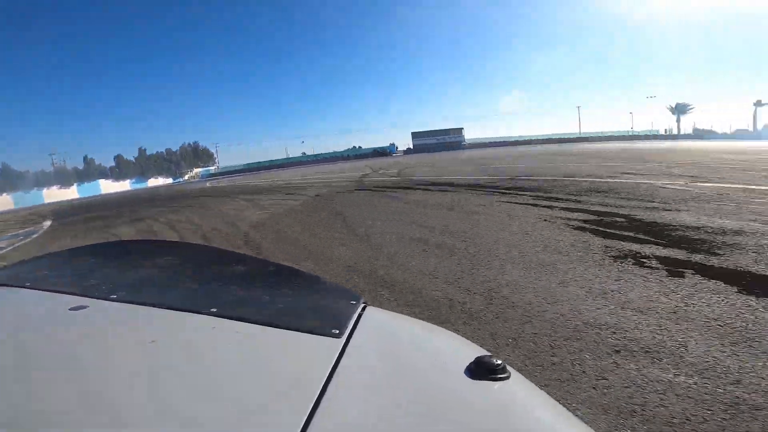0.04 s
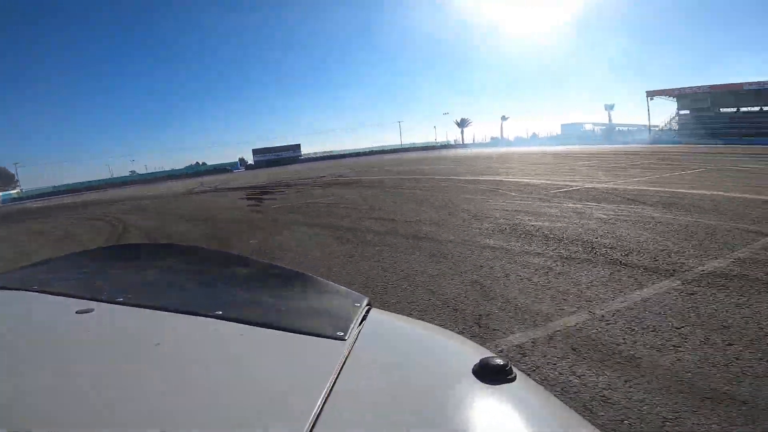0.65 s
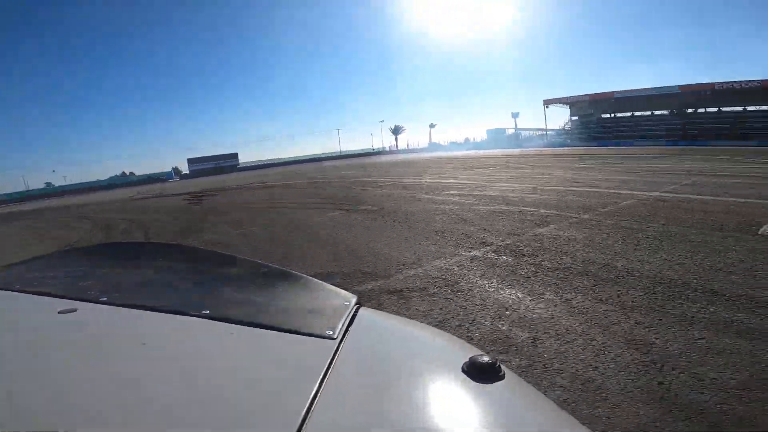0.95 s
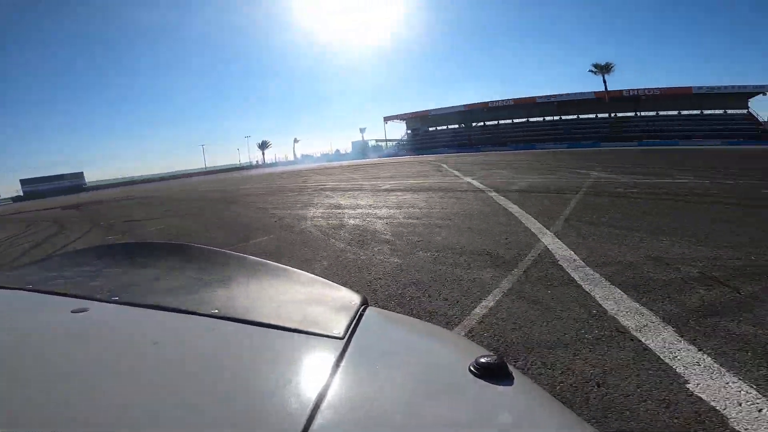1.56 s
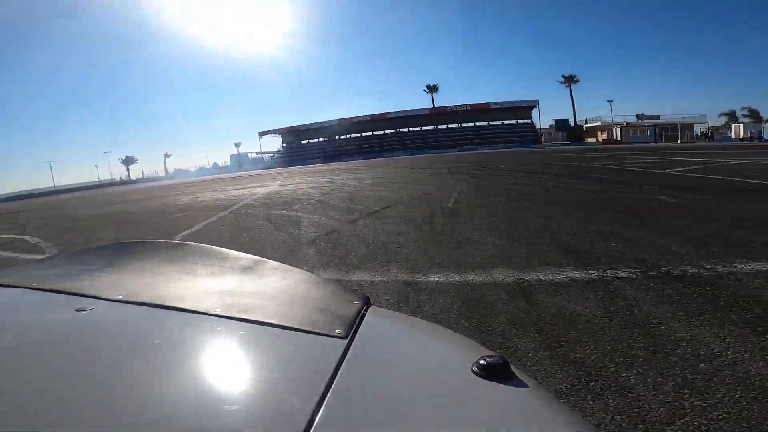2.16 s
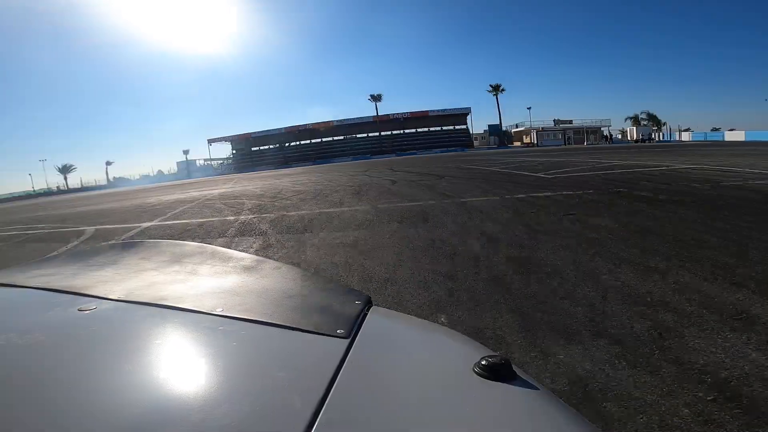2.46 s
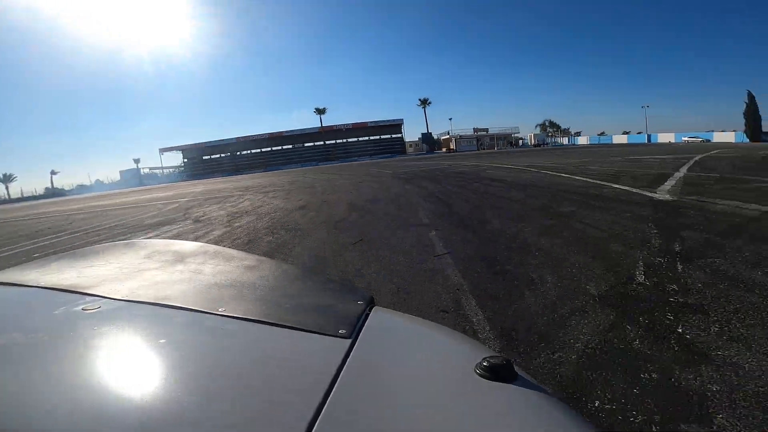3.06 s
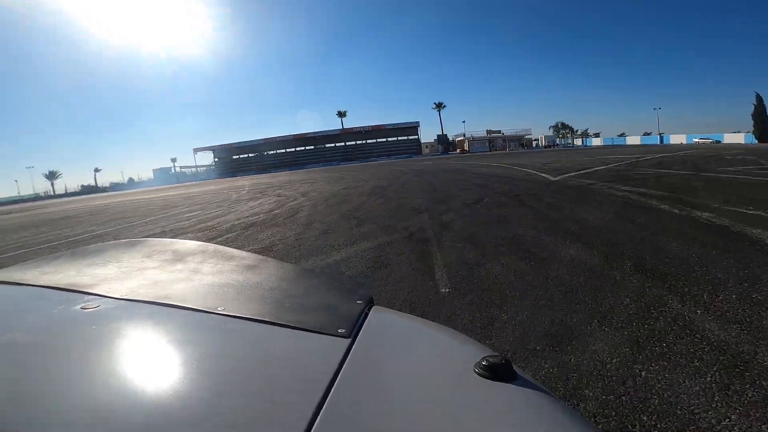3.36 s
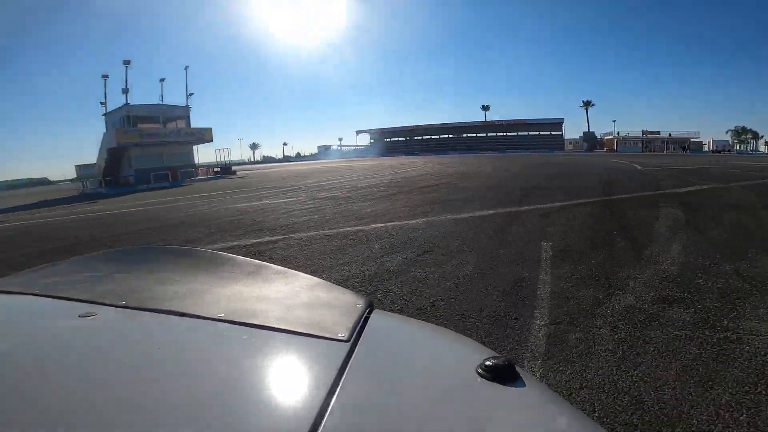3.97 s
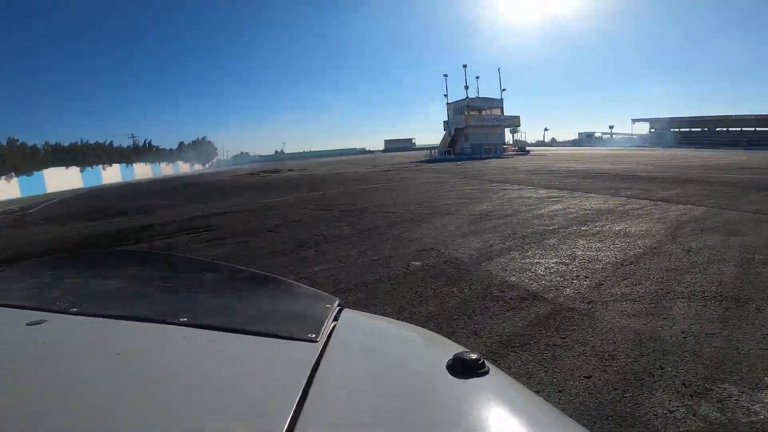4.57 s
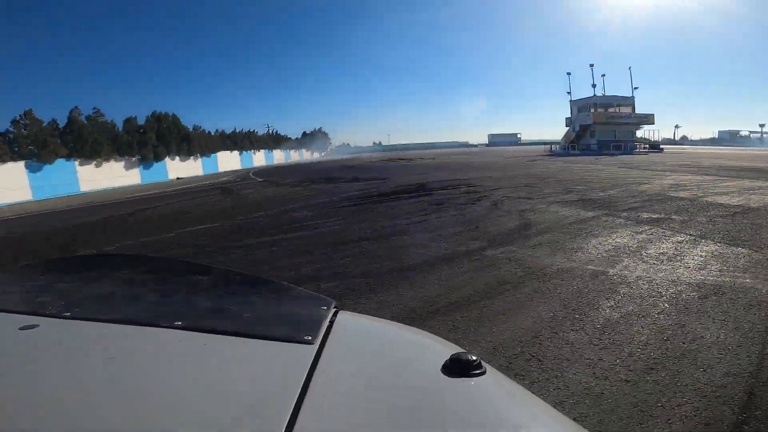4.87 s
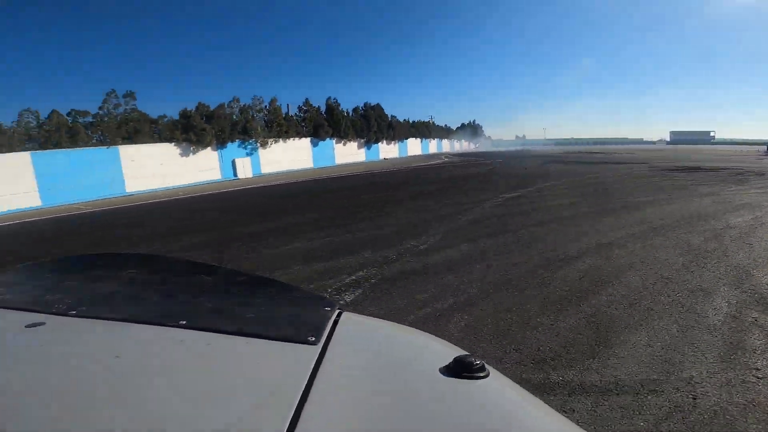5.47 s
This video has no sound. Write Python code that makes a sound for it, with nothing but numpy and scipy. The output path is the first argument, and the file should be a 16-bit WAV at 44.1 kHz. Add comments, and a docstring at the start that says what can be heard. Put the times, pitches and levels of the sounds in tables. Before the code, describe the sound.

A car drifts on a paved track, heard from a microphone on its body. From the start the tyres give a loud, high, wavering squeal that shifts between a clean tone and rough scrubbing. It grows harder and brighter from about 0.5 seconds, with quick chirps between 2 and 2.6 seconds. Underneath, a V8 engine drones unevenly, revving up around 0.5 and 2 seconds. At about 3.4 seconds the squeal falls back as the car swings into the next slide, and the engine comes through with its strongest snarling rev until 4.2 seconds, dotted with short tyre squeaks. The squeal returns just after 4 seconds, and from 4.7 seconds a higher, scraping shriek joins it with a brief throttle blip, lasting to the end at about 5.6 seconds. Low wind buffeting, road rumble and a fluttering hiss of rubber on grit continue throughout.

```python
"""Tyres squeal and chirp in unsteady stick-slip as a V8 car drifts round a paved track.
They fall back as the car swings from one slide into the next, and the revving engine comes through,
its uneven firings ringing the intake and exhaust. The microphone rides on the car's body:
wind buffets it, and the road rumbles and hisses all along."""
import sys
import numpy as np
from scipy import signal
from scipy.fft import rfft, irfft, next_fast_len
from scipy.io import wavfile
from scipy.ndimage import uniform_filter1d

SR = 44100
rng = np.random.default_rng(int(sys.argv[2]) if len(sys.argv) > 2 else 0)


def to_wav(sig):
    """Store sig (one row per channel, or 1-D mono) as 16-bit WAV at the path in sys.argv[1].

    Samples outside -1..1 are clipped; the rate is SR.
    """
    pcm = np.clip(np.atleast_2d(sig), -1, 1) * 32767
    pcm = np.round(pcm).astype(np.int16)
    wavfile.write(sys.argv[1], SR, pcm.T)  # frames by channels


N = 247842
T = np.arange(N) / SR


def squeal(hz, hard_db, purity):
    """One tread rib sings fairly clean; others scrub around its pitch, and their slips add overtones."""
    # overtones of the slip cycle: multiple, level_db
    low_partials = [(2, 2.5), (3, -9.5)]
    # its bright top edge: multiple, level_db
    top_partials = [(4, 0.5), (5, -6), (6, -20)]
    phase, strength = stick_slip(hz * (.99 + scoops()), (.019, 30.8), (.01399, 251), (3.5, 54))
    clean = strength * np.sin(phase)
    scrub, overtones, edge = 0, 0, 0
    scrub_hz = hz * (hz / np.mean(hz)) ** .3  # scrubbing ribs bend further with the load
    for ratio in (.96, .987, 1.015):
        phase, strength = stick_slip(scrub_hz * ratio, (.027, 35), (.024, 330), (3.6, 100))
        scrub += strength * np.sin(phase)
        overtones += strength * partials(phase, low_partials)
        edge += strength * partials(phase, top_partials)
    # the stiffer shoulder of the tread rings higher, the soft middle lower
    for ratio, share_db, octave_db in [(1.19, -5.5, -18), (1.07, 1.7, -1), (.895, -1.5, -.5)]:
        phase, strength = stick_slip(hz * ratio, (.035, 45), (.03494, 232.5), (4, 43))
        scrub += strength * undb(share_db) * np.sin(phase)
        overtones += strength * undb(octave_db) * np.sin(2 * phase)
    note = np.sqrt(purity) * unit(clean) + np.sqrt(1 - purity) * unit(scrub)
    grip = held(3.458, 4.07, attack_s=.15, release_s=.086)  # the tyres grip between the two slides
    body = share_load(note, evenness=.48) * undb(-22 - 9.5 * grip)
    bite = share_load(overtones, evenness=.12) * undb(-34.5 + .68 * hard_db - 9 * grip)
    unload_s, unload_db_per_s = 4.27, 3  # the weight moves over to the other tyre
    load = undb(-unload_db_per_s * np.maximum(T - unload_s, 0))
    return load * (body + bite) + unit(edge) * undb(-61 + hard_db)


def slip():
    """Pitch, hardness and purity of the slide; biting on coarse asphalt makes it harder and higher."""
    # the sliding tread: time_s, pitch_hz, hardness_db, clean_share (0-1)
    slide = [(0, 1039, -3.5, 0.8), (.35, 1092, -1.5, 0.8), (.52, 1108, 1, .15), (.92, 1086, 2.5, .65),
             (1.22, 1078, 3.5, .1), (1.5, 1045, 1, 0.4), (1.78, 1065, 0.5, .65), (2.25, 1083, 1.5, 0.4),
             (2.55, 1130, 3, .3), (2.88, 1098, 0, .63), (3.35, 1087, -6.5, .8), (3.52, 1064, -10.5, 0.4),
             (3.8, 1179, -10.5, .22), (4.27, 1151, -9, 0.5), (4.45, 1084, -2.5, 0.6), (4.62, 1030, -0.5, 0),
             (4.8, 1081, -1.5, .12), (5.62, 1096, 1, 0)]
    # bites of the tread: centre_s, half_width_s, added_hardness_db
    bites = [(.47, 0.06024, 2.5), (.76, 0.11915, 1.5), (1.03, .08, 3.5), (1.26, 0.0801, 2),
             (1.59, .08, 4.5), (1.91, 0.0592, 3), (2.09, 0.0602, 3), (2.33, .08, 4.5), (2.49, .07, 4),
             (2.61, .08, 4), (2.76, 0.0596, 2.5), (3.21, .08, 4), (4.52, 0.0601, 4)]
    hz, hard_db, purity = curves(slide)
    bite_db, bite_hz_per_db = swells(bites), 8
    patchy_db = 1.6 * walk(10)  # grip varies from patch to patch
    return hz + bite_hz_per_db * bite_db, hard_db + bite_db + patchy_db, np.clip(purity, 0, 1)


def stick_slip(hz, wander, jitter, flutter):
    """Phase and strength of a rib that grips and lets go, wandering and shaken by the asphalt's grain."""
    # wander, jitter: (share of the pitch, rate_hz); flutter: (depth_db, rate_hz)
    drift, shake, flutter_db = (depth * walk(rate_hz) for depth, rate_hz in (wander, jitter, flutter))
    phase = 2 * np.pi * np.cumsum(hz * (1 + drift + shake)) / SR
    return phase, unit(undb(flutter_db))


def scoops():
    """The pitch sags and snaps back as the tread winds up and lets go at uneven intervals."""
    per_s, depth, snap_s = 9, .04495, .014
    cycles = np.cumsum(per_s * np.exp(.35 * walk(6))) / SR + rng.random()
    return depth * uniform_filter1d(.5 - cycles % 1, int(snap_s * SR))


def share_load(x, evenness):
    """The ribs share one friction force: as one slips harder the others ease, evening the sum; rms 1."""
    power = uniform_filter1d(unit(x) ** 2, SR // 45) + .01
    return unit(x * power ** (-evenness / 2))


def shriek():
    """The other rear tyre sinks to a lower note and shrieks mostly on its octave, in a haze of scraping."""
    # its slides: start_s, end_s, first_pitch_hz, level_db
    slides = [(1.202, 1.835, 1023, -37.5), (4.27, 4.6, 1180, -32), (4.702, 5.8, 1061, -26)]
    settled_hz, settle_s, fade_s = 970, .2, .08
    hz, gain = settled_hz, 0
    for start, end, first_hz, db in slides:
        sliding = held(start, end, fade_s, fade_s)
        sinking_hz = settled_hz + (first_hz - settled_hz) * np.exp(-np.maximum(T - start, 0) / settle_s)
        hz = np.where(sliding > 0, sinking_hz, hz)
        gain += sliding * undb(db)
    waver = 1 + .011 * walk(8.147)
    phase, strength = stick_slip(hz * waver, (.015, 45), (.027, 393), (3.5, 78))
    note = strength * partials(phase, [(1, -10.5), (2, 0), (4, -25)])
    scrape = noise([(500, -14.5), (800, 7), (960, 3.5), (1400, -.5), (1650, 4), (2700, -1.5),
                    (3300, -16), (4800, -17.5), (6000, -33.5), (12000, -69.5)])
    return gain * (note + undb(-7) * scrape)


def chirps():
    """Brief gliding squeaks where the tread snatches."""
    # snatches: centre_s, half_width_s, start_hz, end_hz, level_db
    snatches = [(2.08, 0.035, 1170, 1378, -21.5), (2.335, 0.045, 1220, 1333, -22),
                (2.525, 0.058, 1340, 1210, -23), (2.611, 0.067, 1374, 1434, -27.5),
                (3.811, 0.055, 1340, 1514, -22.5), (3.956, .09, 1336, 1341, -28.5),
                (4.031, 0.055, 798, 857, -25.5), (4.203, 0.046, 1357, 1286, -26),
                (4.323, 0.033, 1260, 1176, -31), (4.559, 0.045, 880, 815.3, -26),
                (5.43, 0.072, 890, 850, -31)]
    out = np.zeros(N)
    shake = .037 * walk(290)
    flutter = unit(undb(3.5 * walk(90)))
    for centre, half_width, start_hz, end_hz, db in snatches:
        near = np.abs(T - centre) < half_width
        place = (T[near] - centre) / half_width
        hz = np.interp(place, [-.5, .5], [start_hz, end_hz]) * (1 + shake[near])
        phase = 2 * np.pi * np.cumsum(hz) / SR
        envelope = undb(db) * np.cos(np.pi / 2 * place) ** 2 * flutter[near]
        out[near] += envelope * partials(phase, [(1, 0), (2, -23)])
    return out


def wheel_arch(x):
    """The panels over the wheel ring with the tyres' overtones."""
    # panel resonances: centre_hz, width_hz, level_db
    panels = [(2995, 230, 3.5), (4060, 100, -12.5)]
    return x + sum(undb(db) * signal.lfilter(*signal.iirpeak(hz, hz / width, fs=SR), x)
                   for hz, width, db in panels)


def engine():
    """Firings ring the intake and exhaust, gas rasps with each one, and the firing rate itself booms."""
    # engine speed: time_s, firing_rate_hz
    revs = [(0, 122.7), (.2, 128.7), (.52, 164.8), (.68, 163.3), (.9, 134.4), (1.05, 126.5), (1.85, 128.2),
            (2.22, 149.2), (2.42, 148.3), (3.0, 127.7), (3.5, 114), (3.66, 115.2), (4.08, 148.9),
            (4.24, 150.8), (4.46, 130.7), (4.78, 156), (5.0, 139.1), (5.27, 126.8), (5.62, 137.1)]
    # tone of the intake and exhaust: frequency_hz, level_db
    pipe_tone = [(100, -22.5), (230, -13), (350, 4), (450, -7), (530, -3.5), (590, 6), (680, 6.5),
                 (780, -4), (900, -1.5), (1250, -9.5), (1650, -23.5), (2050, -9.5), (3000, -26.5),
                 (6000, -68)]
    hz, = curves(revs)
    firings = np.cumsum(hz * (1 + .0017 * walk(21))) / SR
    pulses = cylinder_pulses(firings)
    gas = np.exp(-(firings % 1) / .32) * rng.standard_normal(N)
    snarl = colour(unit(pulses) + undb(-20) * unit(gas), pipe_tone)
    boom = unit(np.sin(2 * np.pi * firings) * undb(walk(12)))
    boom_db, snarl_db = throttle()
    octaves = np.log2(hz / np.mean(hz))  # louder as the revs climb
    return snarl * undb(snarl_db + 8 * octaves) + boom * undb(boom_db + 7.5 * octaves)


def cylinder_pulses(firings):
    """One pressure pulse a firing; each cylinder has its own strength and timing."""
    # the eight cylinders in firing order: strength_db, late_ms
    cylinders = [(-2, -0.23), (1.5, 0.13), (-1, 0.011), (-3, -.06), (2.5, 0.027), (0.5, .18), (2.5, 0.049),
                 (0, 0.13)]
    index = np.arange(1, int(firings[-1]))
    size_db, late_ms = np.array(cylinders)[index % len(cylinders)].T
    size_scatter, time_scatter = rng.standard_normal((N // 100, 2))[:len(index)].T
    size = undb(size_db + .48 * size_scatter)
    late_s = (late_ms + .013 * time_scatter) / 1000
    at = np.clip(np.interp(index, firings, np.arange(N)) + late_s * SR, 0, N - 2)
    sample, fraction = at.astype(int), at % 1
    return np.bincount(sample, size * (1 - fraction), N) + np.bincount(sample + 1, size * fraction, N)


def throttle():
    """The exhaust boom and the snarl both swell while the pedal is down."""
    # pedal presses: start_s, end_s, boom_rise_db, snarl_rise_db
    presses = [(0.288, 0.646, 7, 6.5), (1.08, 1.8, 3, 2), (1.792, 2.413, 8, 6), (3.5, 4.24, 9, 15.5),
               (4.684, 4.82, 3.5, 10), (5.5, 5.801, 8, 0)]
    boom_db, snarl_db = -28, -39.5  # on part throttle
    for start, end, boom_rise_db, snarl_rise_db in presses:
        pedal = held(start, end, attack_s=.14, release_s=.085)
        boom_db += boom_rise_db * pedal
        snarl_db += snarl_rise_db * pedal
    return boom_db, snarl_db


def wind():
    """Eddies beat on the microphone port in light gusts."""
    # tone of the buffeting: frequency_hz, level_db
    buffet_tone = [(10, -24.5), (22, -0.5), (45, 2.5), (75, 1.5), (100, 1.5), (135, -2), (180, -6.5),
                   (225, -9), (290, -21), (480, -39.5), (1600, -52.5), (4000, -90)]
    # airflow over the microphone: time_s, level_db
    airflow = [(0, -19.5), (2, -18.5), (3.3, -18), (3.7, -18), (4.3, -18.5), (5.62, -17.5)]
    air_db, = curves(airflow)
    return noise(buffet_tone) * undb(air_db + 1.6 * walk(3.3))


def road(hard_db):
    """The tyres rumble through the car's body, and rubber tears over the grit in a fluttering hiss."""
    # tone of the body rumble: frequency_hz, level_db
    rumble_tone = [(120, -17.5), (230, 3.5), (330, -1), (480, -5.5), (700, -8), (1000, -8), (1600, -17.5),
                   (2400, -25), (4000, -39.5), (8000, -55.5), (12000, -70.5)]
    # rougher and smoother stretches of track: centre_s, half_width_s, rumble_change_db
    stretches = [(.05, .4, 6.5), (1.6, .16, 7.5), (2.15, 0.34, 5.5), (3.05, 0.47, -9), (3.7, 0.59, 9.5),
                 (4.71, 0.11, 9.5), (5.5, 0.53, 7)]
    # tone of rubber on grit: frequency_hz, level_db
    hiss_tone = [(300, -12.5), (800, 2.5), (1700, -2.5), (2600, 0), (3500, -0.5), (4900, -11.5),
                 (6000, -22), (7500, -30), (10000, -43), (12500, -53)]
    rumble = noise(rumble_tone) * undb(-36 + swells(stretches))
    hiss = noise(hiss_tone) * undb(-40.5 + hard_db + walk(25) + walk(150))
    return rumble + hiss


def undb(db):
    """Decibels to gain."""
    return 10 ** (np.asarray(db) / 20)


def unit(x):
    """Scale to rms 1."""
    return x / np.sqrt(np.mean(x ** 2))


def curves(table):
    """The columns of a timed table, sample by sample."""
    times, *columns = np.transpose(table)
    return [np.interp(T, times, column) for column in columns]


def colour(x, tone):
    """Equalise by a curve of (frequency_hz, level_db) points; rms 1."""
    hz, db = np.transpose(tone)
    size = next_fast_len(N + SR // 10)
    bin_hz = np.maximum(np.arange(size // 2 + 1) * SR / size, 1)
    gain = undb(np.interp(np.log(bin_hz), np.log(hz), db))
    return unit(irfft(rfft(x, size) * gain, size)[:N])


def noise(tone):
    """Noise coloured by a tone curve; rms 1."""
    return colour(rng.standard_normal(N), tone)


def walk(rate_hz):
    """Smooth random motion up to about rate_hz; rms 1."""
    lead = SR // 2
    lowpass = signal.butter(2, rate_hz, fs=SR, output="sos")
    return unit(signal.sosfilt(lowpass, rng.standard_normal(N + lead))[lead:])


def partials(phase, table):
    """Harmonics locked to the slip cycle, one for each (multiple, level_db) row."""
    return sum(undb(db) * np.sin(multiple * phase) for multiple, db in table)


def held(start, end, attack_s, release_s):
    """Rises to 1 around start, holds, and falls to 0 around end."""
    return np.clip(np.minimum((T - start) / attack_s, (end - T) / release_s) + .5, 0, 1)


def swells(table):
    """Smooth humps, summed."""
    return sum(height * np.cos(np.pi / 2 * np.clip((T - centre) / half_width, -1, 1)) ** 2
               for centre, half_width, height in table)


def scene():
    """Tyres, engine, wind and road at one microphone."""
    hz, hard_db, purity = slip()
    tyres = undb(4) * wheel_arch(squeal(hz, hard_db, purity) + shriek() + chirps())
    return (tyres + engine() + wind() + road(hard_db))[None]


def record(dry):
    """Automatic gain control evens out the level, and a steep filter cuts the top."""
    knee_db, makeup_db, top_hz = -16, 3, 11800
    power = uniform_filter1d(dry ** 2, SR // 50, axis=-1)
    gain = (1 + power / undb(knee_db) ** 2) ** -.4
    lowpass = signal.ellip(8, .2, 70, top_hz, fs=SR, output="sos")
    return signal.sosfilt(lowpass, dry * gain * undb(makeup_db))


dry = scene()
out = record(dry)
to_wav(out)
```